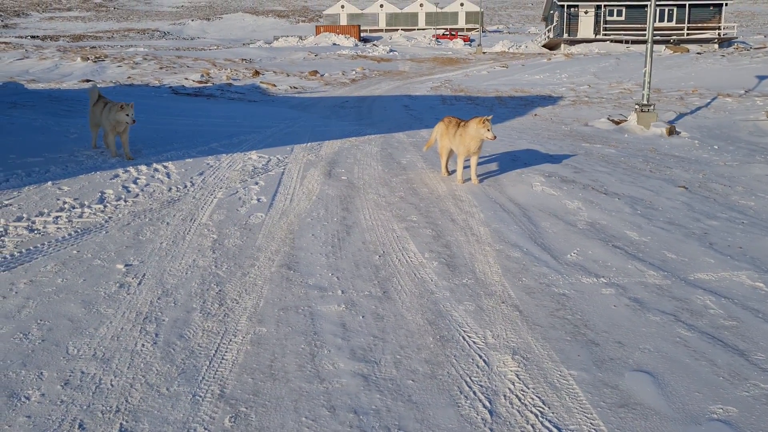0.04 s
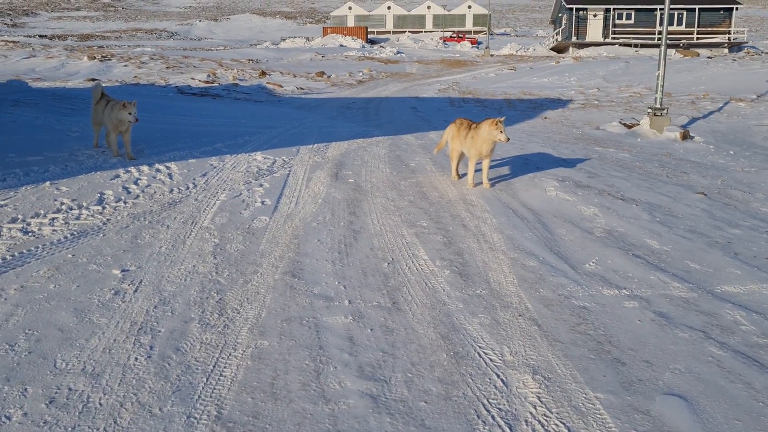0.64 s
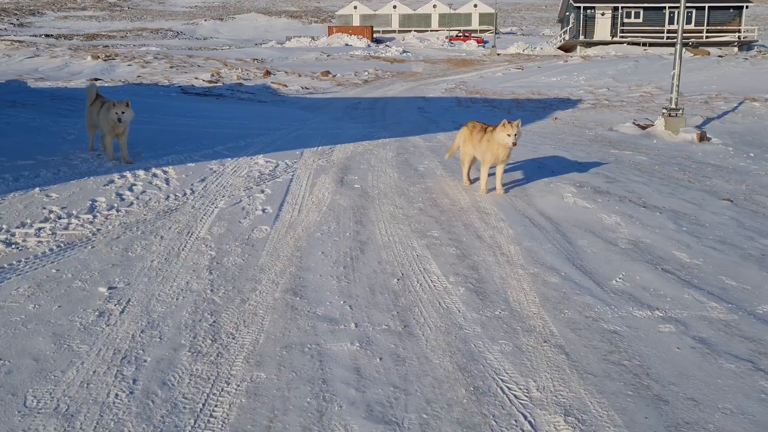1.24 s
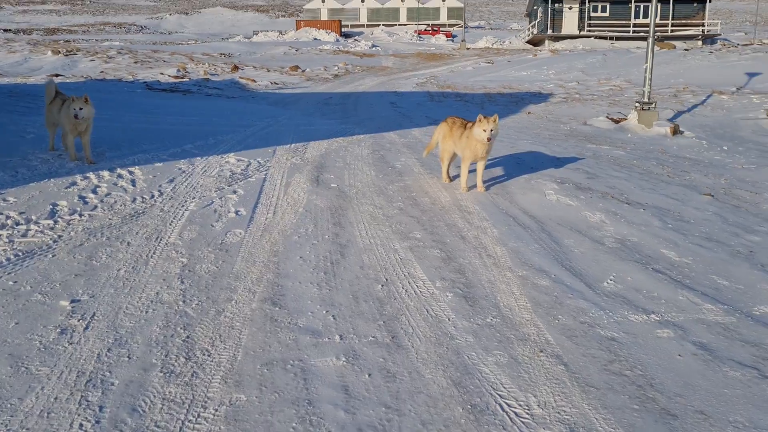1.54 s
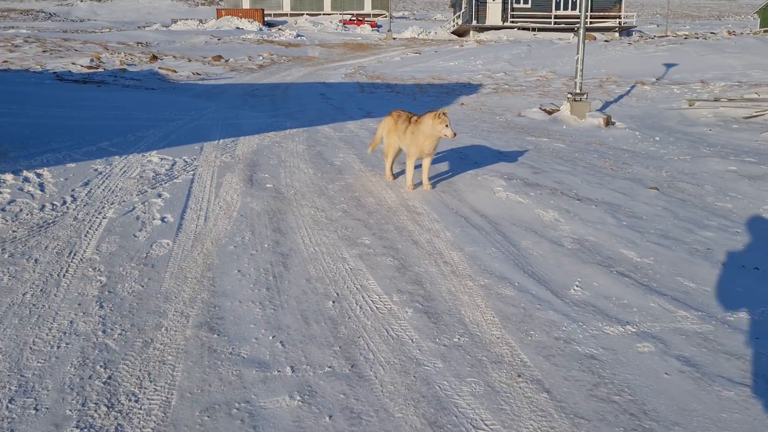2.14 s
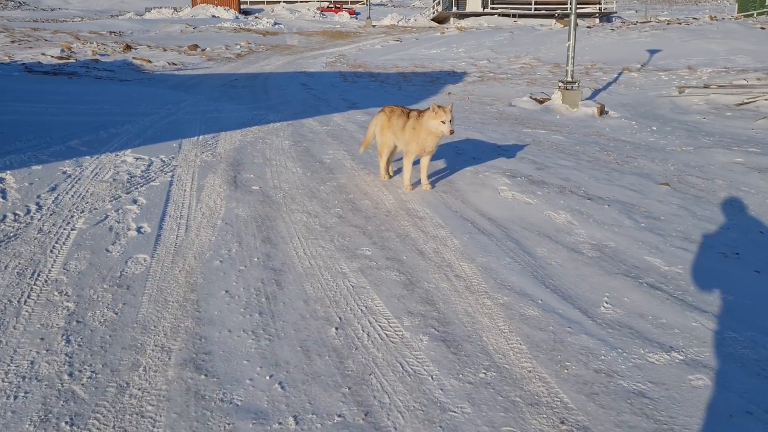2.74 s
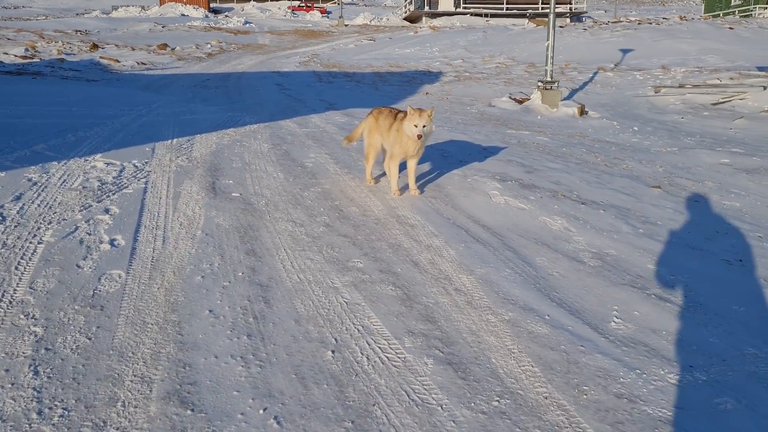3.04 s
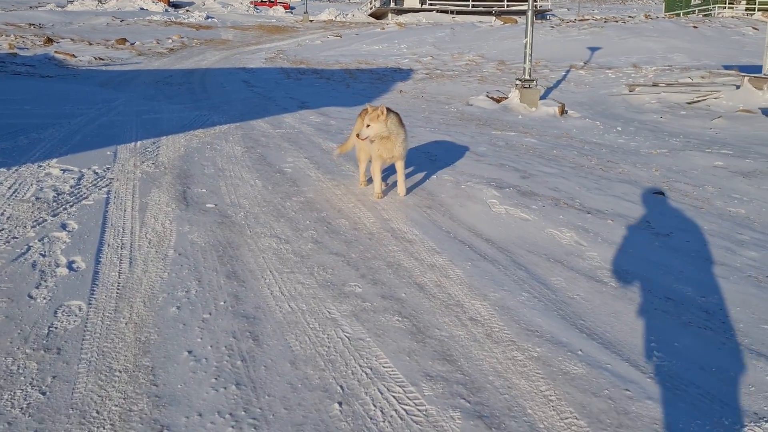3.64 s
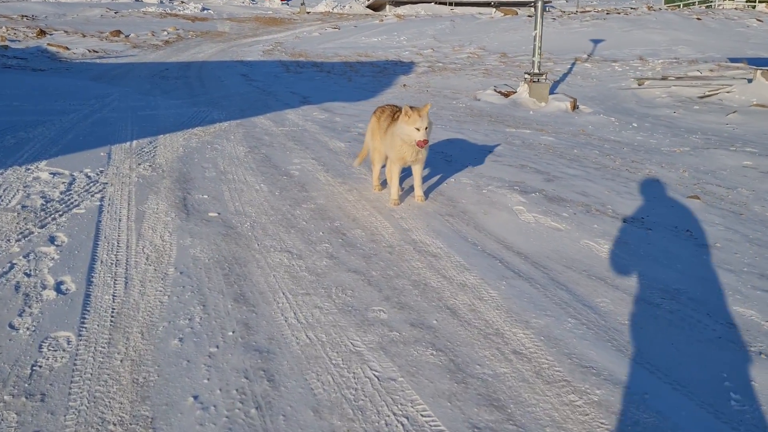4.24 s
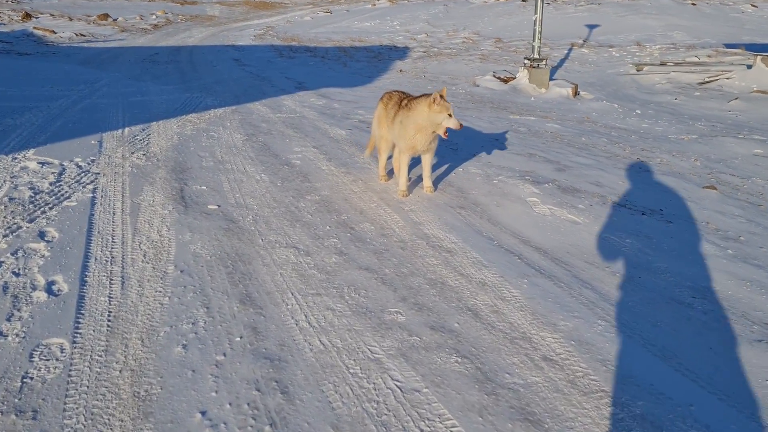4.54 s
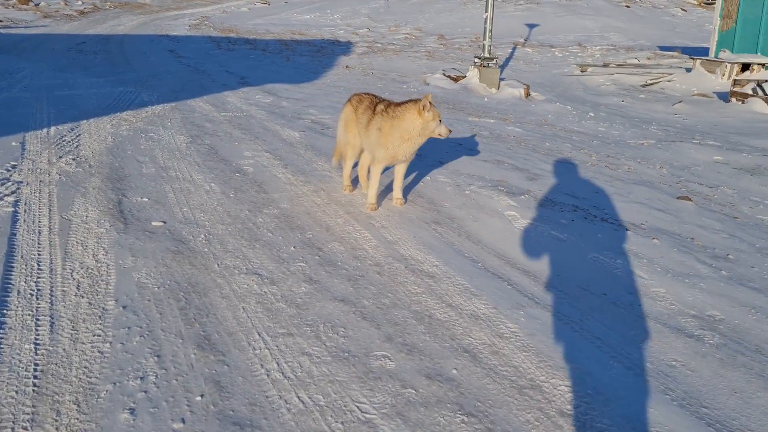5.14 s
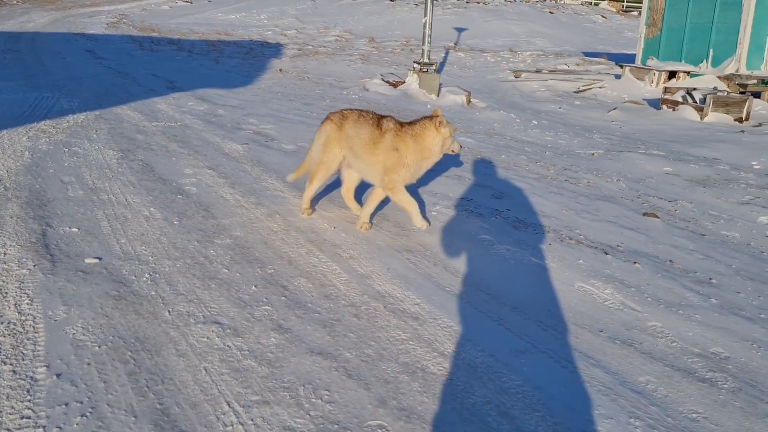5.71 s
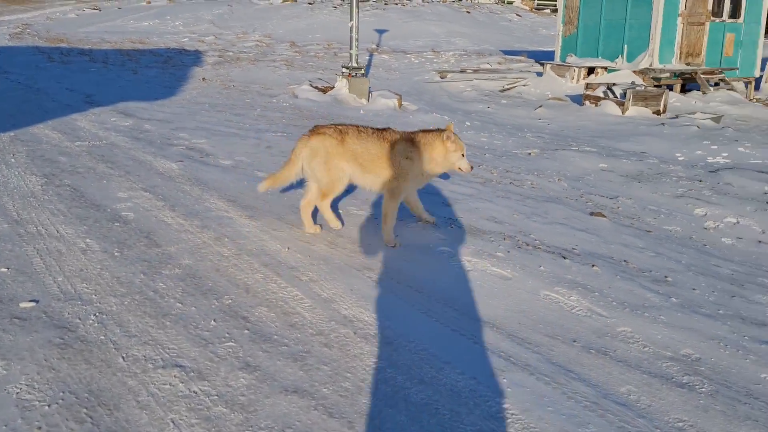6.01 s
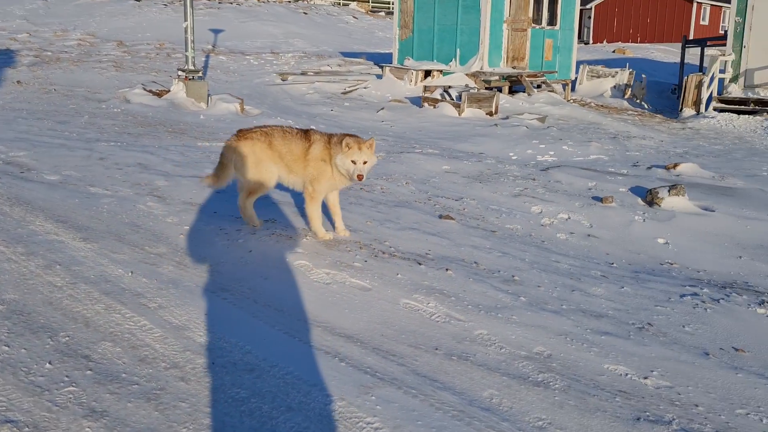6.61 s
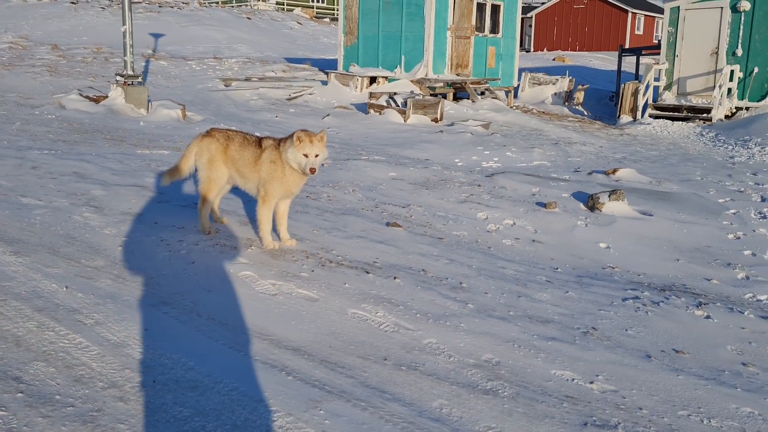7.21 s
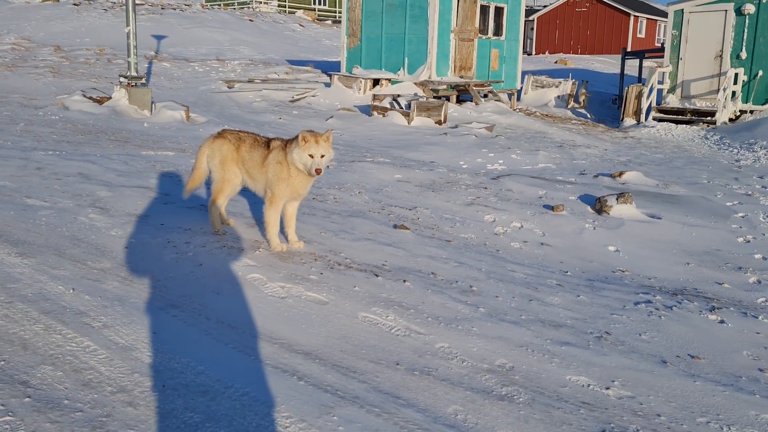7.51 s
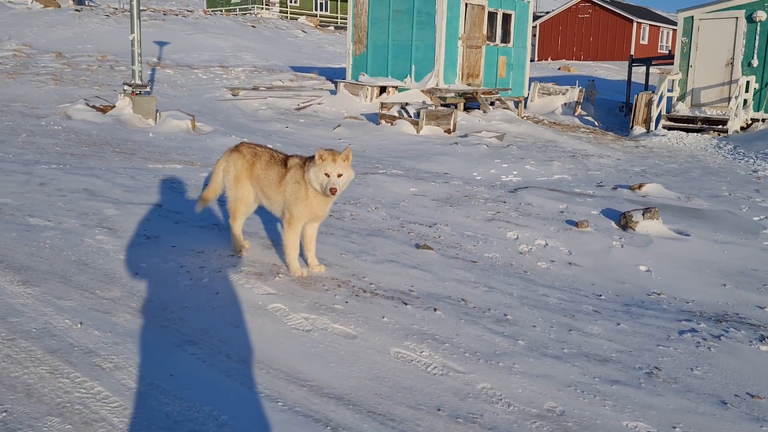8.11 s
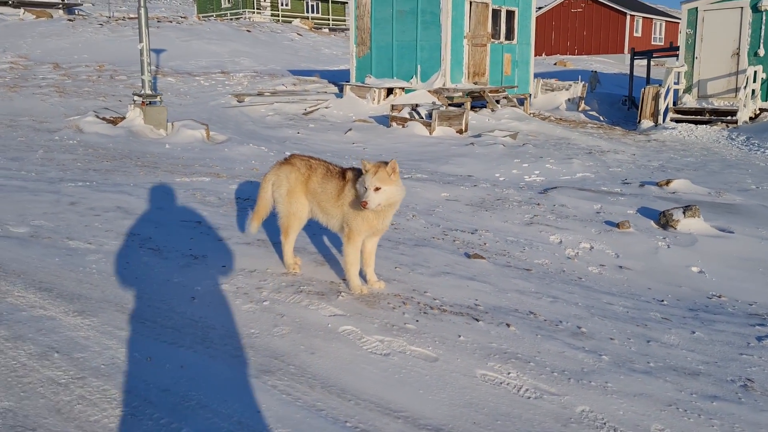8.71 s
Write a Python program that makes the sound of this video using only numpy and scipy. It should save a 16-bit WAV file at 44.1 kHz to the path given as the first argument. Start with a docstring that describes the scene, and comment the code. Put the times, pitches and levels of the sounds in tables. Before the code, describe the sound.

Slow footsteps crunch and creak on hard-packed snow, with a coat swishing softly and light wind buffeting the microphone.

```python
"""Footsteps on cold snow

Someone in a padded coat walks slowly over cold, hard-packed snow, holding the microphone.
Each boot packs, crunches and scrapes the snow and snaps its crust as ice bonds fracture;
now and then stick-slip friction makes it creak or squeak. The coat swishes with the stride,
and a light wind buffets the two microphone ports. The ground is open, so there is no echo."""
import sys
import numpy as np
from scipy import signal
from scipy.fft import rfft, irfft
from scipy.io import wavfile
from scipy.ndimage import uniform_filter1d

SR = 44100
rng = np.random.default_rng(int(sys.argv[2]) if len(sys.argv) > 2 else 0)


def int16_out(signal):
    """Quantize to a 16-bit WAV file."""
    q = np.round(np.clip(np.atleast_2d(signal).T, -1, 1) * 32767)
    wavfile.write(sys.argv[1], SR, q.astype(np.int16))


N = 390726
TIME = np.arange(N) / SR
CREAK_HZ = 1700


def from_db(db):
    """Amplitude grows tenfold with every 20 dB."""
    return np.exp(np.asarray(db) * (np.log(10) / 20))


def rms_one(x):
    """Normalisation to unit mean power."""
    return x / np.sqrt(np.mean(x ** 2) + 1e-20)


def in_time(rows):
    """Linear interpolation of a level curve at every sample."""
    return np.interp(TIME, *np.transpose(rows))


def pan(left_db):
    """Constant-power panning: the left gain exceeds the right by left_db."""
    return rms_one(from_db([[left_db / 2], [-left_db / 2]]))


def drift(rate):
    """Random modulation of unit spread, with `rate` new values a second."""
    knots = rng.standard_normal(N // 20) * np.sqrt(3 / 2)
    return np.interp(TIME * rate, np.arange(len(knots)), knots)


def swell(age, half_s):
    """A Gaussian envelope about age 0, of standard deviation half_s."""
    return np.exp(-.5 * np.minimum((age / half_s) ** 2, 200))


def butterworth(x, hz, kind, order=2):
    """A filter with a maximally flat passband."""
    return signal.sosfilt(signal.butter(order, hz, kind, fs=SR, output="sos"), x)


def colour(x, spectrum, size=2 ** 13):
    """Minimum-phase filtering: folding the cepstrum gives the spectrum a causal response."""
    hz, db = np.transpose(spectrum)
    grid = np.maximum(np.arange(size // 2 + 1) * SR / size, 1)
    gain = from_db(np.interp(np.log(grid), np.log(hz), db))
    cepstrum = irfft(np.log(gain))
    cepstrum[1:size // 2] *= 2
    cepstrum[size // 2 + 1:] = 0
    response = irfft(np.exp(rfft(cepstrum)))
    return signal.oaconvolve(np.atleast_2d(x), response[None], axes=1)[:, :N]


def resonate(x, hz, q):
    """A damped resonator with unit gain at its peak."""
    return signal.lfilter(*signal.iirpeak(min(hz, SR / 5), max(q, .5), fs=SR), x + 1e-18)


def evened(x, size):
    """Division by the running rms over `size` samples leaves only the faster grain."""
    power = uniform_filter1d(uniform_filter1d(np.mean(x ** 2, axis=0), size), size)
    return x / np.sqrt(np.maximum(power, 1e-6 * power.mean()))


def air():
    """Faint broadband noise of the open air, uncorrelated between the ports."""
    # Each row: frequency in Hz, relative spectral level in dB.
    spectrum = [(40, 16), (350, -2.5), (900, 5), (2500, -18), (12500, -17.5), (15000, -78)]
    return from_db(-68) * rms_one(colour(rng.standard_normal((2, N)), spectrum))


def wind(lumpy_db, gusty_db):
    """Turbulent pressure rumbles independently at each port, more on the left; gusts reach both."""
    # Each row: time in seconds, relative level in dB.
    strength = [(0, -50), (.75, -57.5), (3.85, -54.5), (4.03, -35.5), (4.25, -56), (4.7, -51), (5.35, -42),
                (6.0, -58.5), (7.1, -60), (8.85, -69)]
    # Each row: frequency in Hz, relative spectral level in dB.
    spectrum = [(20, -41), (32, -18), (45, -2.5), (67, -2.5), (105, -6), (180, -17.5), (400, -27),
                (1500, -79)]
    swirl = rng.standard_normal((2, N)) * from_db(lumpy_db * np.array([drift(30), drift(30)]))
    rumble = evened(colour(swirl, spectrum) * pan(left_db=8), size=6000)
    return rumble * from_db(in_time(strength) + 9.5 + gusty_db * drift(7.5))


def eddies(half_s, left_db, size=8192):
    """An eddy striking the ports is a pressure pulse; stronger ones reach higher frequencies."""
    # Each row: time in seconds, level in dB.
    hits = [(0.116, -33), (0.33, -34.5), (0.436, -35), (0.618, -35.5), (1.52, -33.5), (1.645, -33.5),
            (2.453, -37), (2.603, -36), (2.975, -35.5), (4.01, -25.5), (4.806, -34.5), (5.133, -28.5),
            (5.319, -27), (5.358, -28), (5.553, -29), (5.783, -32.5), (6.15, -36.5), (6.454, -31.5),
            (6.861, -35.5), (7.443, -33.5), (7.68, -35)]
    top_edge_hz, db_per_octave = 231, 8
    out = np.zeros((2, N + 2 * size))
    burst = swell((np.arange(size) - size // 2) / SR, half_s)
    strongest_db = max(db for s, db in hits)
    for (s, db), swirl in zip(hits, rng.standard_normal((len(hits), 2, size))):
        edge_hz = top_edge_hz * 2 ** ((db - strongest_db) / db_per_octave)
        thud = burst * butterworth(swirl, [edge_hz / 3, edge_hz], "band")
        thud /= np.sqrt(np.sum(thud ** 2, axis=1, keepdims=True) / np.sum(burst ** 2))
        at = int(s * SR) + size // 2
        out[:, at:at + size] += from_db(db) * pan(left_db) * thud
    return out[:, size:size + N]


def stroke(s, length_s, crest, first_db, last_db, attack_s, release_s):
    """The envelope of one contact rises to its crest and decays in exponential segments."""
    end = s + length_s
    times = [s - attack_s, s, s + np.clip(crest, .02, .98) * length_s, end, end + release_s]
    near = slice(*np.searchsorted(TIME, [times[0], times[-1]]))
    gain = np.zeros(N)
    gain[near] = from_db(np.interp(TIME[near], times, [-60, first_db, 0, last_db, -60]))
    return gain


def stirring(db):
    """Power of the slight friction that goes on between strokes while the walker moves."""
    # Each row: time in seconds, amount of motion as a gain in dB.
    motion = [(0, -14.5), (.3, -9), (.9, -1.5), (2.0, 0), (5.2, 5), (6.0, 4), (6.35, -0.5), (6.6, -21),
              (7.08, -15), (7.2, -8), (7.58, -6), (7.95, 0.5), (8.6, 3.5), (8.75, -4.5)]
    return from_db(in_time(motion) + db) ** 2


def coat_level():
    """Sleeves and trouser legs brush past as incoherent sources: their powers add. Returns dB."""
    # Each row: start in seconds, length in seconds, relative level in dB.
    swishes = [(0.066, 0.32, -75), (0.693, 0.096, -71), (0.889, 0.074, -67), (1.01, 0.064, -68.5),
               (1.132, 0.28, -71.5), (1.425, 0.1, -67.5), (1.69, 0.17, -72), (2.427, 0.25, -65),
               (2.969, 0.09, -68), (3.154, 0.18, -65.5), (3.901, 0.2, -64), (4.408, 0.17, -66.5),
               (4.721, 0.17, -65), (5.019, 0.2, -73), (5.394, 0.061, -64.5), (5.737, 0.18, -65),
               (6.134, 0.16, -67), (7.131, 0.16, -72.5), (7.35, 0.11, -71), (8.045, 0.051, -69),
               (8.39, 0.26, -69)]
    power = stirring(-72.5)
    for s, length_s, db in swishes:
        speed = stroke(s, length_s, crest=.83, first_db=-2, last_db=-2, attack_s=.097, release_s=.085)
        power += (from_db(db) * speed) ** 2
    return 10 * np.log10(power)


def coat(grain_db, flutter_db):
    """Friction noise of woven fabric near the right port: brighter when fast, shaded on the left."""
    # Each row: frequency in Hz, relative spectral level in dB.
    spectrum = [(400, 5), (1500, 8), (3000, 0), (5500, -2), (7600, -5), (8800, -8), (11500, -7.5),
                (15500, -25.5)]
    # Each row: frequency in Hz, level at the left port against the right in dB.
    left_shade = [(3000, -1), (7400, -1), (8800, -10.5), (12500, -8), (15000, 2)]
    level_db = coat_level()
    speed = from_db(level_db + 61)
    rub = rng.standard_normal((2, N)) * from_db(grain_db * drift(900) + flutter_db * drift(90))
    hiss = butterworth(rng.standard_normal((2, N)), 10000, "high")
    left, right = colour(rub + speed * from_db(13.5) * hiss, spectrum)
    fabric = evened(np.vstack([colour(left, left_shade), right]), size=3000)
    pressure = np.minimum(speed, 1) ** .25   # a fast swing presses the folds together
    return fabric * pressure * from_db(level_db + 13)


def grains(per_s, spread_db, low_hz, high_hz, q, patchy_db=2.0, count=12):
    """Ice bonds fracture in random clusters; each excites one of several resonances of drifting gain."""
    born = rng.random(N) < per_s * np.exp(.7 * drift(40)) / SR
    strength = from_db(spread_db * np.minimum(rng.exponential(1, N), 4))
    clicks = born * strength * rng.choice([-1, 1], N)
    resonator = rng.integers(0, count, N)
    return sum(resonate(clicks * (resonator == k), hz, q) * from_db(patchy_db * drift(20)) / np.sqrt(hz)
               for k, hz in enumerate(np.geomspace(low_hz, high_hz, count)))


def scrapes():
    """Abrasion: a sliding sole shears off fine crystals in a dense, bright grit."""
    # Each row: centre in seconds, half length in seconds, level in dB.
    slides = [(0.73, 0.037, -61.5), (1.465, 0.051, -52), (3.003, 0.059, -52.5), (4.285, 0.016, -57),
              (4.54, 0.071, -53), (5.112, 0.14, -55.5), (5.825, 0.031, -41), (7.839, 0.074, -54),
              (8.583, 0.038, -54.5)]
    # Each row: frequency in Hz, filter gain in dB.
    spectrum = [(1200, 3.5), (2600, 2.5), (3900, 2), (5400, -8.5), (7500, -8), (14000, -31)]
    crystals = grains(per_s=3500, spread_db=4.6, low_hz=2100, high_hz=3100, q=.72)
    grit = evened(colour(crystals, spectrum), size=1200)[0]
    return grit * sum(from_db(db) * swell(TIME - s, half_s) for s, half_s, db in slides)


def squeaks(jitter_octaves, overtone_db):
    """Stick-slip oscillation of cold snow under load gives a brief, rough, gliding tone."""
    # Each row: centre and half length in seconds, level in dB, pitch in Hz, glide in octaves a second.
    tones = [(2.264, 0.015, -42.5, 850, -3.5), (3.032, 0.028, -43.5, 676, 11.5),
             (4.519, .008, -40, 556, -2), (5.144, 0.016, -32.5, 851.5, -9.5),
             (5.853, .018, -37.5, 1577, -7.5), (8.467, .006, -34.5, 944, 0.5),
             (8.585, 0.025, -38, 756, 5.5)]
    out = np.zeros(N)
    waver = jitter_octaves * drift(700)
    grip = rms_one(from_db(1.5 * drift(300)))
    for s, half_s, db, hz, glide in tones:
        near = np.abs(TIME - s) < 4 * half_s
        age = TIME[near] - s
        phase = 2 * np.pi * np.cumsum(hz * 2 ** (glide * age + waver[near])) / SR
        tone = rms_one(np.sin(phase) + from_db(overtone_db) * np.sin(2 * phase))
        out[near] += from_db(db) * tone * grip[near] * swell(age, half_s)
    return out


def snaps(rows, half_cycles, crack_db, size=512):
    """Sudden yielding radiates a wavelet of about one cycle; the higher ones crackle with splinters."""
    out = np.zeros(N + size)
    age = (np.arange(size) - size // 2) / SR
    for (s, peak_db, hz), noise in zip(rows, rng.standard_normal((len(rows), size))):
        splinters = from_db(crack_db) * (hz / CREAK_HZ) ** 2 * butterworth(noise, [2500, 6500], "band")
        wavelet = np.sin(2 * np.pi * hz * age + .5 * noise[0]) + splinters
        at = int(s * SR) - size // 2
        out[at:at + size] += from_db(peak_db) * wavelet * swell(age, half_cycles / hz)
    return out[:N]


def creaks():
    """Slow stick-slip motion of the sole: an almost regular train of small, high snaps."""
    # Each row: start in seconds, length in seconds, upper level in dB, slips per second.
    runs = [(.522, .042, -33, 190), (.74, .045, -37, 120), (2.075, .04, -34, 105), (3.15, .08, -32, 130),
            (7.785, .05, -30, 200), (8.372, .07, -34, 70)]
    ticks = []
    for (s, length_s, db, per_s), chance in zip(runs, rng.random((len(runs), 20, 3))):
        for k, (late, weak, high) in enumerate(chance):
            if k < length_s * per_s:
                hz = CREAK_HZ * 2 ** (.5 * (high - .5))
                ticks.append((s + (k + .5 * late) / per_s, db - 6 * weak, hz))
    return snaps(ticks, half_cycles=.5, crack_db=-12)


def crust():
    """Brittle fracture: single snaps of the crust and duller knocks of the packed layer."""
    # Each row: time in seconds, relative peak level in dB, pitch in Hz.
    fractures = [(1.808, -32, 700), (2.408, -26, 950), (2.471, -27, 1350), (2.55, -25, 1250),
                 (2.596, -25, 1300), (2.629, -23, 1150), (2.652, -27, 1300), (2.762, -31, 1800),
                 (3.347, -27, 1200), (3.396, -28, 1350), (3.478, -34, 1300), (4.056, -23, 450),
                 (4.079, -26, 500), (4.248, -30, 1350), (4.301, -30, 1200), (4.388, -35, 1000),
                 (4.887, -28, 1200), (4.906, -26, 800), (5.293, -26, 1000), (5.495, -32, 1400),
                 (5.591, -23, 1250), (5.66, -23, 1150), (5.735, -21, 1250), (5.907, -27, 800),
                 (6.769, -45, 700), (7.237, -35, 1100), (7.408, -33, 1050), (7.688, -31, 1100),
                 (8.303, -33, 1600), (8.655, -33, 850), (8.679, -29, 850), (8.756, -29, 1050),
                 (8.823, -32, 1400)]
    return from_db(3) * snaps(fractures, half_cycles=.36, crack_db=-7)


def boot_levels():
    """Crunch and packing follow the load on each tread and add in power. Returns both in dB."""
    # Each row: start and length in seconds, share of the length until full weight,
    # crunch level in dB, packing level in dB.
    treads = [(0.5, 0.25, 0.28, -49, -76), (1.251, 0.26, 0.8, -52.5, -48), (2.15, 0.36, 0.4, -50, -53.5),
              (2.791, 0.29, 0.77, -47, -50), (3.131, 0.17, 0.82, -41.5, -50.5),
              (3.585, 0.21, 0.16, -41, -46), (3.973, 0.15, 0.66, -55.5, -38.5),
              (4.383, 0.2, 0.71, -43.5, -45), (4.722, 0.2, 0.17, -46, -55), (4.998, 0.26, 0.85, -42.5, -43),
              (5.302, 0.13, .7, -47, -44), (5.681, 0.23, .85, -35.5, -40), (6.044, 0.41, 0.05, -77, -49.5),
              (6.488, 0.19, 0.25, -86, -51), (6.809, 0.18, 0.28, -80, -48),
              (7.135, 0.05, 0.3, -51.5, -50.5), (7.355, 0.073, 0.64, -53, -46),
              (7.712, 0.21, 0.4, -42.5, -46), (8.414, 0.23, 1, -43, -50)]
    crunch, pack = stirring(-62.5), stirring(-60.5)
    for s, length_s, crest, crunch_db, pack_db in treads:
        weight = stroke(s, length_s, crest, first_db=-8, last_db=-6.5, attack_s=.14, release_s=.14)
        crunch += (from_db(crunch_db) * weight) ** 2
        pack += (from_db(pack_db) * weight) ** 2
    return 10 * np.log10(crunch), 10 * np.log10(pack)


def break_rate(db, idle_per_s=70, loaded_per_s=600, exponent=1.1):
    """Fracture rate is a power law of load: lone ticks under a light foot, dense under full weight."""
    return idle_per_s + loaded_per_s * from_db(exponent * (db - db.max()))


def slips(per_s, jitter, decay_s=.00032, grinding_db=-19):
    """Irregular stick-slip: each slip breaks a burst of ice bonds, with fine grinding in between."""
    slip_count = np.floor(np.cumsum(per_s * np.exp(jitter * drift(150))) / SR)
    kicks = np.diff(slip_count, prepend=0) * from_db(4.5 * rng.standard_normal(N))
    bursts = signal.lfilter([1], [1, -np.exp(-1 / (decay_s * SR))], kicks + 1e-18)
    return (bursts + from_db(grinding_db)) * rng.standard_normal(N)


def boots():
    """Slips excite the crust's resonances, now lower, now higher; the layer below compacts dully."""
    # Each row of both tables: frequency in Hz, filter gain in dB.
    crunch_spectrum = [(200, -12.5), (560, 0), (950, 4), (1700, -2.5), (2300, -4), (2900, -10.5),
                       (6000, -7.5), (15000, -72)]
    pack_spectrum = [(170, -12.5), (290, 1), (450, 1), (640, -4), (1200, -12), (3000, -46)]
    crunch_db, pack_db = boot_levels()
    runs = slips(break_rate(crunch_db), jitter=.7)
    blend = np.pi / 4 + .6 * np.tanh(drift(20))
    ringing = np.cos(blend) * resonate(runs, 850, q=1.3) + np.sin(blend) * resonate(runs, 1550, q=1.5)
    crunch = evened(colour(ringing, crunch_spectrum), size=1700)
    deep_breaks = grains(break_rate(pack_db), spread_db=3, low_hz=294, high_hz=700, q=2.05)
    pack = evened(colour(deep_breaks, pack_spectrum), size=1800)
    return (crunch * from_db(crunch_db + .44) + pack * from_db(pack_db))[0]


def at_ports(x):
    """Path difference: direct sound from the feet reaches the left port later and a little weaker."""
    # Each entry: time in seconds of a step, in turn ahead of the microphone and to its right.
    step_times = [.6, 1.45, 2.2, 3.0, 3.6, 4.4, 5.2, 5.9, 7.7, 8.6]
    ahead_ms, right_ms = .057, .23
    lag_ms = np.interp(TIME, step_times, np.resize([ahead_ms, right_ms], len(step_times)))
    left = np.interp(TIME - lag_ms / 1000, TIME, x)
    return np.array([left, x]) * pan(left_db=-1.7)


def scattered(x, scatter_db, decay_s, edge_hz, size=512, count=3):
    """Scattering by legs, body and ground: dull, early reflections that shift as the walker moves."""
    age = np.arange(size) / SR
    shares = np.array([drift(5) for _ in range(count)])
    out = 0
    for share in shares / np.linalg.norm(shares, axis=0):
        response = rng.standard_normal((2, size)) * age * np.exp(-age / decay_s)
        response /= np.sqrt(np.sum(response ** 2) / 2)
        response = butterworth(response, edge_hz, "low", order=1)
        out = out + signal.oaconvolve((share * x)[None], response, axes=1)[:, :N]
    return from_db(scatter_db) * out


def scene():
    """Superposition of feet below, coat beside, wind on the ports and open air all round."""
    steps = crust() + boots() + scrapes() + squeaks(jitter_octaves=.2185, overtone_db=-12) + creaks()
    feet = at_ports(steps) + scattered(steps, scatter_db=-3.5, decay_s=.0017, edge_hz=3000)
    background = air() + eddies(half_s=.013, left_db=3)
    return background + feet + coat(grain_db=3, flutter_db=1.5) + wind(lumpy_db=7, gusty_db=3)


def record(dry):
    """Band limiting: the recorder cuts the deepest rumble and the highest treble."""
    treble_cut = signal.ellip(10, .2, 80, 15800, fs=SR, output="sos")
    return signal.sosfilt(treble_cut, butterworth(dry, 22, "high"))


dry = scene()
out = record(dry)
int16_out(out)
```